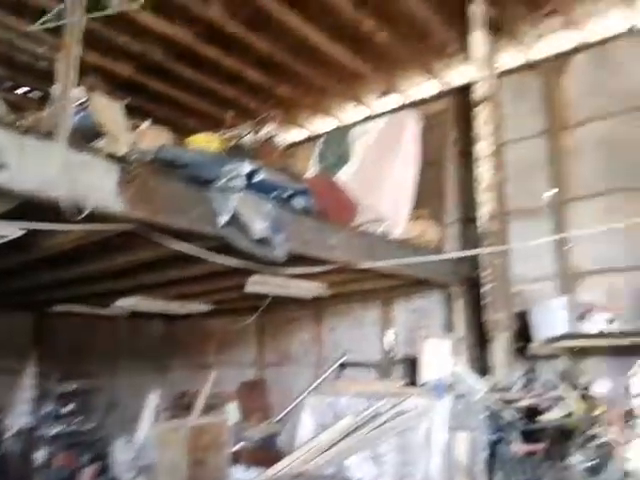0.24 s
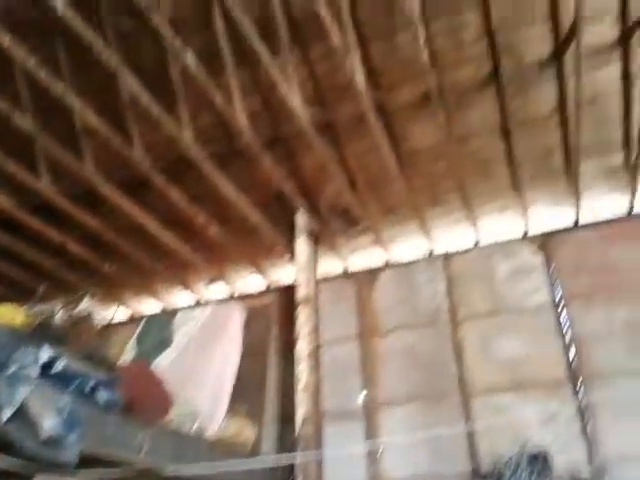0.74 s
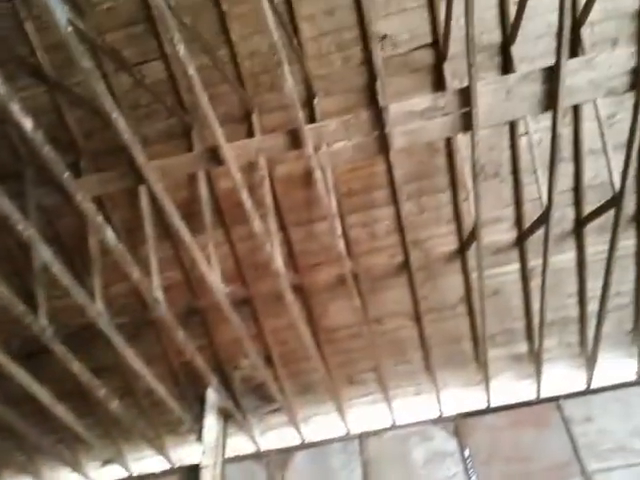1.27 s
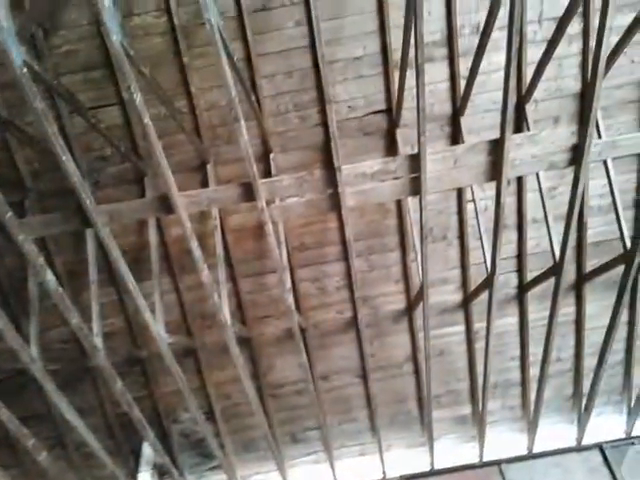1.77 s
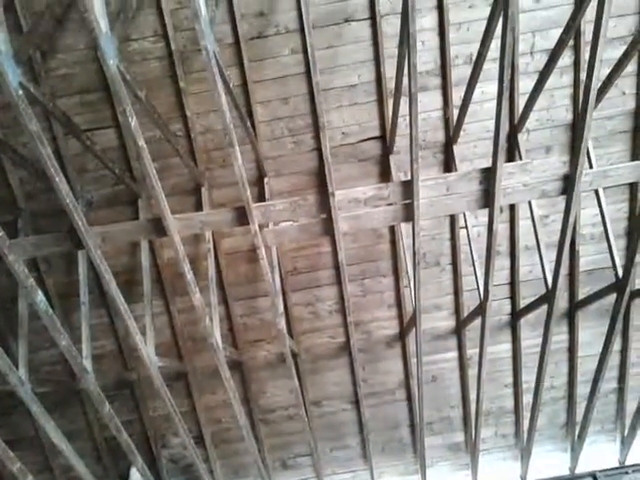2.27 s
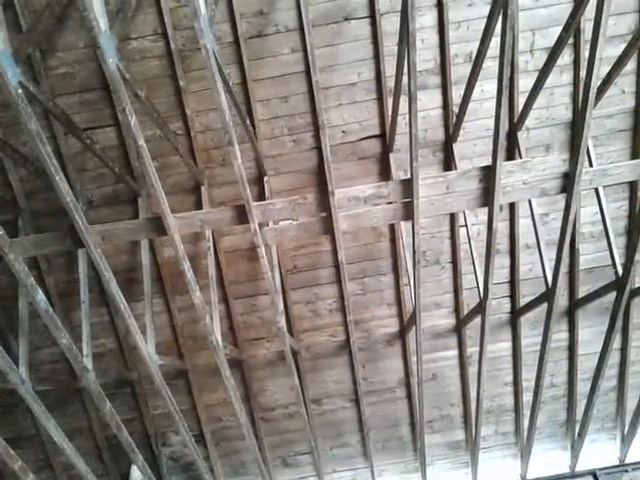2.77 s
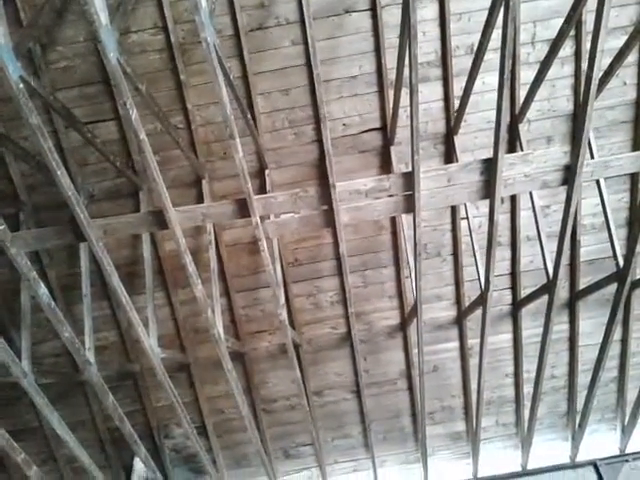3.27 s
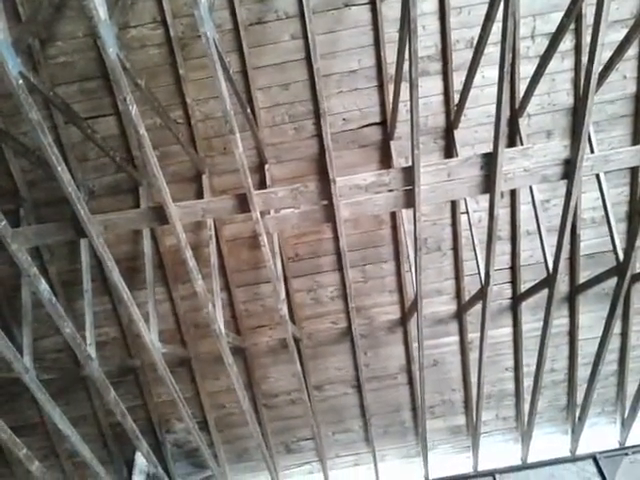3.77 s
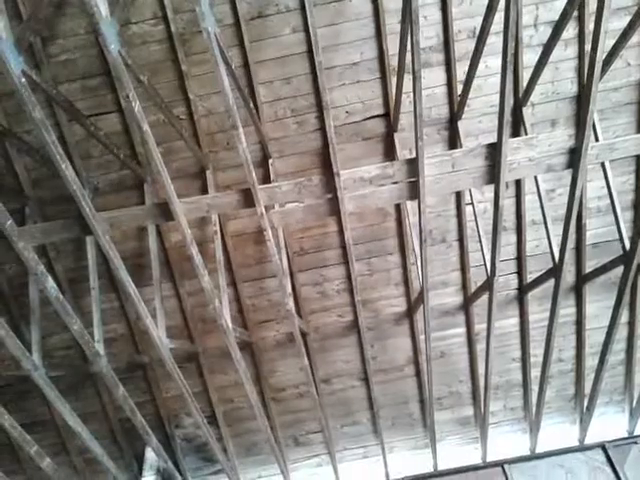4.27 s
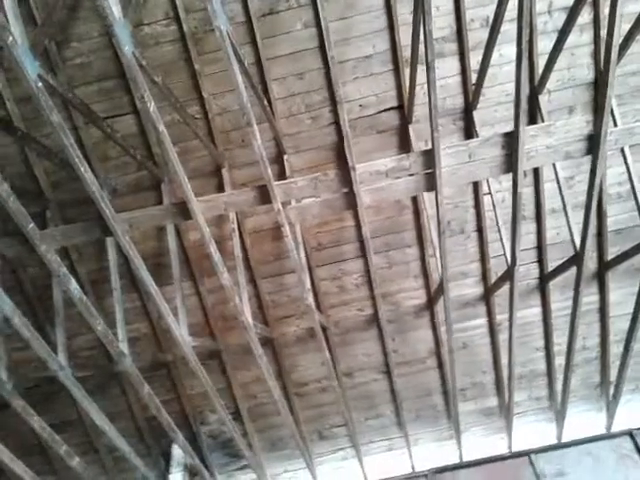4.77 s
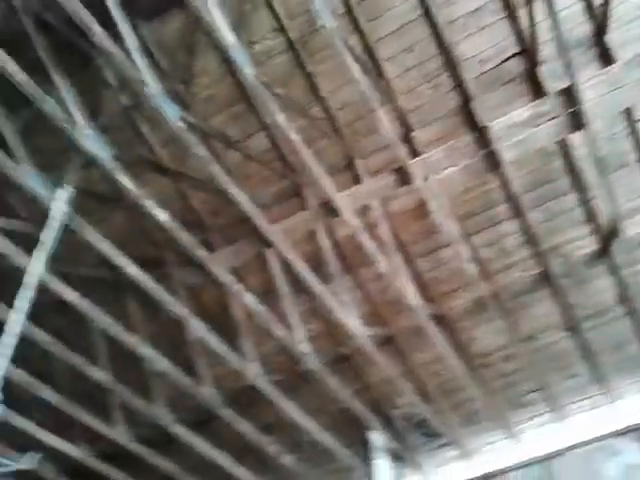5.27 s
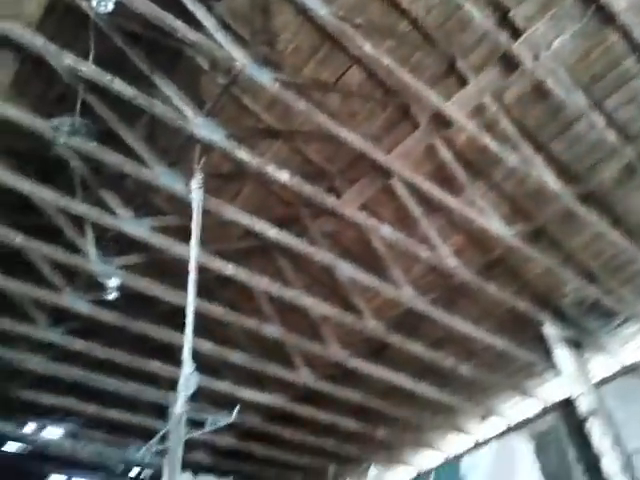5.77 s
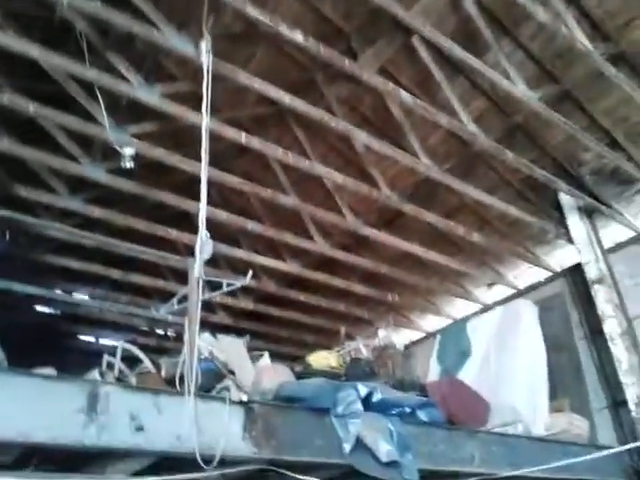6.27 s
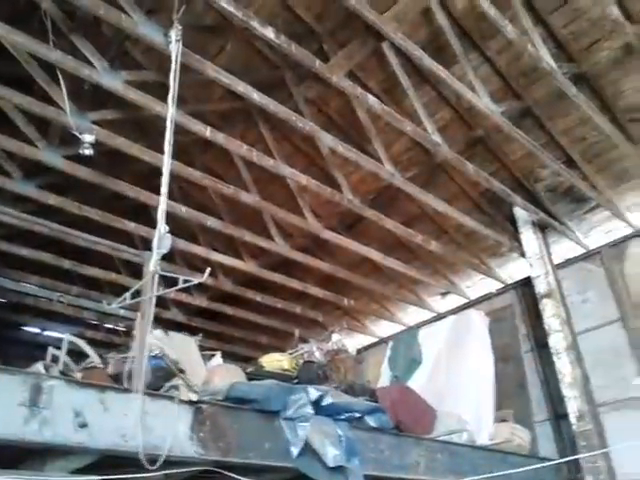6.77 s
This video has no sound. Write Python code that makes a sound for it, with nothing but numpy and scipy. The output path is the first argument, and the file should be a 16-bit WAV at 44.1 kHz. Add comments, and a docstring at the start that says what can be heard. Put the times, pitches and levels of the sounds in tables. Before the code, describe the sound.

Inside a large old barn, swallows give two sharp, high, two-syllable alarm calls. A quieter twitter follows, made of rasps, nasal chirps, thin chips and sliding whistles, with a few light ticks and soft bumps between them. Near the end a distant bird repeats a quick falling figure, growing louder. Each note leaves a short ringing tail. A phone microphone picks it up in mono over a soft outdoor rumble.

```python
"""Over a soft outdoor rumble, swallows give two sharp two-syllable alarm calls under a barn roof.
A twitter follows: rasps and nasal chirps (pulses of air ringing the throat), chips and low slurred
whistles (gliding tones of the syrinx), with a few ticks and bumps between them. Last, from 6.5 s,
a distant bird repeats a falling figure, ever louder. Rafters and walls smear every note into a
ringing tail, and a phone hears it all in mono, ducking the quiet moments."""
import sys
import numpy as np
from scipy import signal
from scipy.fft import rfft, irfft, next_fast_len
from scipy.io import wavfile
from scipy.ndimage import uniform_filter1d, map_coordinates

SR = 44100
rng = np.random.default_rng(int(sys.argv[2]) if len(sys.argv) > 2 else 0)


def to_wav(sig):
    """Store sig (one row per channel, or 1-D mono) as 16-bit WAV at the path in sys.argv[1].

    Samples outside -1..1 are clipped; the rate is SR.
    """
    pcm = np.clip(np.atleast_2d(sig), -1, 1) * 32767
    pcm = np.round(pcm).astype(np.int16)
    wavfile.write(sys.argv[1], SR, pcm.T)  # frames by channels


N = 310023
TIME = np.arange(N) / SR


def undb(db):
    """Decibels to gain."""
    return 10 ** (np.asarray(db) / 20)


def unit(x):
    """Scale to rms 1."""
    return x / np.sqrt(np.mean(x ** 2) + 1e-20)


def add(track, start_s, x):
    """Mix x into the track from start_s on."""
    i = int(start_s * SR)
    x = x[max(-i, 0):max(len(track) - i, 0)]
    track[max(i, 0):max(i, 0) + len(x)] += x


def equalise(x, curve):
    """Filter by an EQ curve of (frequency [Hz], gain [dB]) points."""
    hz, db = np.transpose(curve)
    size = next_fast_len(len(x))
    bin_hz = np.arange(size // 2 + 1) * SR / size
    gain = undb(np.interp(np.log(bin_hz + 1), np.log(hz), db))
    return irfft(rfft(x, size) * gain, size)[:len(x)]


def resonate(x, hz, width_hz):
    """A resonance applied twice, gain 1 at its centre."""
    b, a = signal.iirpeak(hz, hz / width_hz, fs=SR)
    return signal.lfilter(b, a, signal.lfilter(b, a, x))


def wander(size, rate):
    """Smooth random modulation with a spread of about 1, changing rate times a second."""
    steps = np.arange(size) * rate / SR
    return map_coordinates(rng.standard_normal(int(steps[-1]) + 2), [steps], order=3, mode="nearest")


# Tone of the outdoor air: (frequency [Hz], gain [dB])
AIR_EQ = [(15, -19), (25, -59), (33, -7), (119, -2.5), (152, -3), (246, -6), (274, -5), (433, -10.5),
          (614, -13), (684, -14.5), (2060, -19.5), (4750, -28.5), (6920, -19.5), (9810, -36), (15500, -36)]
# Slow swell of the rumble: (time [s], gain [dB])
RUMBLE_SWELL = [(0, -0.5), (1.4, -1), (3.4, -1.5), (5.0, 1.5), (6.2, 1.5), (7.03, 1.5)]


def outdoor_bed(rumble_gain_db=-54.5, air_gain_db=-55, hiss_db=-64, crossover_hz=600):
    """A low outdoor rumble that swells slowly, faint air above it, and a narrow band of high hiss."""
    noise = unit(equalise(rng.standard_normal(N), AIR_EQ))
    rumble = signal.sosfiltfilt(signal.butter(2, crossover_hz, fs=SR, output="sos"), noise)
    air = noise - rumble
    hiss = unit(resonate(rng.standard_normal(N), hz=6900, width_hz=1100))
    swell_db = np.interp(TIME, *np.transpose(RUMBLE_SWELL))
    return undb(rumble_gain_db + swell_db) * rumble + undb(air_gain_db) * air + undb(hiss_db) * hiss


def barn_reverb(send, early_db=-3, tail_db=-2, low_t60=0.79, high_t60=0.47, build_s=0.031, early_s=0.024):
    """Separate echoes off roof and rafters, then a dense tail whose treble dies first."""
    t = TIME[:SR]
    hz, frame_s, spectrum = signal.stft(rng.standard_normal(SR), SR, nperseg=256)
    t60 = np.interp(hz, [3000, 10000], [low_t60, high_t60])
    decay = np.exp(-np.log(1000) * frame_s / t60[:, None])
    tail = signal.istft(spectrum * decay, SR)[1][:SR]
    echoes = rng.standard_normal(SR) * (rng.random(SR) < 500 / SR)  # about 500 a second
    early = echoes * np.exp(-t / early_s)
    build = 1 - np.exp(-t / build_s)  # echoes take a moment to gather
    response = undb(tail_db) * unit(tail * build) + undb(early_db) * unit(early * np.sqrt(build))
    return signal.fftconvolve(send, response / np.sqrt(SR))[:len(send)]


# Dry ticks and soft bumps. In every cue list, level feeds the reverb and direct is added for the dry path:
# (time [s], level [dB], centre [Hz], width [Hz], decay [s], direct [dB])
KNOCK_CUES = [(0.68, -51, 1300, 3000, 0.0038, 7), (0.792, -55.5, 140, 335, 0.013, 16),
              (2.42, -48.5, 1360, 1000, 0.01, -1.5), (2.70, -51, 1350, 800, .008, -1.5),
              (2.825, -57, 1660, 800, 0.024, 5), (5.246, -50, 100, 150, 0.007, 13.5),
              (5.449, -39, 1520, 1200, 0.0031, 2.5), (5.675, -41, 2260, 1700, 0.0065, -0.5),
              (5.922, -44.5, 1590, 2700, 0.013, 0), (5.938, -48, 1700, 2570, 0.014, 6.5)]


def knocks():
    """Each knock is a short burst of noise in one broad resonance."""
    t = TIME[:SR // 5]
    for start_s, db, hz, width_hz, decay_s, direct_db in KNOCK_CUES:
        body = unit(resonate(rng.standard_normal(len(t)), hz, width_hz))
        yield start_s, db, direct_db, body * np.exp(-t / decay_s)


# How the beak colours a whistle's octave: (frequency [Hz], gain [dB])
OCTAVE_EQ = [(5000, -5), (8500, 5), (10000, 19.5), (10900, 10), (11600, 12), (13500, -8), (15500, -26)]


def whistle(length_s, start_hz, mid_hz, end_hz, bend, octave_db=-26, fade_share=0.12, flutter_db=0):
    """The syrinx glides by way of a middle pitch, a weak octave on top; bend 2 arches, 8 holds flat."""
    u = np.linspace(0, 1, int(length_s * SR))
    glide_hz = mid_hz + (start_hz - mid_hz) * (1 - u) ** bend + (end_hz - mid_hz) * u ** bend
    hz = glide_hz * (1 + .006 * wander(len(u), rate=900))
    phase = 2 * np.pi * np.cumsum(hz) / SR
    push = np.sin(np.pi * u)  # the octave grows with the push of air
    tone = np.sin(phase) + undb(octave_db) * push * equalise(np.sin(2 * phase), OCTAVE_EQ)
    flutter = undb(flutter_db * wander(len(u), rate=190))
    return unit(tone * flutter * signal.windows.tukey(len(u), fade_share))


# A distant bird's figure, louder at each repeat: (time [s], level [dB])
FAR_CUES = [(6.512, -62.5), (6.638, -58.5), (6.766, -55.5), (6.893, -55), (7.02, -53)]
# The notes of the figure: (offset [s], length [s], from [Hz], to [Hz], trim [dB], direct [dB])
FAR_FIGURE = [(-.023, 0.0184, 2934, 2420, 0, -4), (-.012, 0.0197, 5270, 4630, -11, 0),
              (0.001, .02, 4300, 3400, -3.5, -6), (0.011, 0.0143, 3500, 2950, 0.5, -2),
              (.03, 0.0156, 2900, 2760, -3, 8)]


def far_bird():
    """A figure of soft, fluttering, falling whistles, about eight times a second."""
    for start_s, db in FAR_CUES:
        for offset_s, length_s, from_hz, to_hz, trim_db, direct_db in FAR_FIGURE:
            note = whistle(length_s, from_hz, (from_hz + to_hz) / 2, to_hz,
                           bend=1, octave_db=-45, fade_share=0.35, flutter_db=3)
            yield start_s + offset_s, db + trim_db, direct_db, note


# Low warbled whistles: (time [s], length [s], from [Hz], to [Hz], level [dB])
SLUR_CUES = [(-.06, 0.051, 3200, 4905, -41.5), (-.015, 0.069, 4950, 3087, -53),
             (1.82, 0.022, 3015, 4700, -44), (4.496, 0.067, 3550, 3050, -55),
             (4.559, 0.04, 3310, 4220, -52), (4.701, 0.052, 3400, 3990, -49.5),
             (4.751, 0.039, 3750, 2630, -48), (4.808, .036, 3130, 4470, -45)]


def slurs(direct_db=-13):
    """Whistles that glide up or down and linger toward their high end."""
    for start_s, length_s, from_hz, to_hz, db in SLUR_CUES:
        mid_hz = min(from_hz, to_hz) + .62 * abs(to_hz - from_hz)
        yield start_s, db, direct_db, whistle(length_s, from_hz, mid_hz, to_hz, bend=2.03)


# Clear chips, drier when the bird faces the phone:
# (time [s], length [s], pitch [Hz], level [dB], direct [dB])
CHIP_CUES = [(0.086, .04, 7200, -50, -13.5), (0.995, .008, 5447, -30.5, 6.5), (1.53, .11, 6860, -57, -17),
             (1.741, 0.032, 7130, -45, -1), (1.837, 0.031, 7200, -47.5, 1.5), (2.674, 0.021, 6830, -47, 14),
             (3.545, 0.0385, 5960, -56, 4), (3.635, 0.011, 5990, -44, 4), (3.728, 0.045, 5820, -53, 6)]


def chips():
    """Nearly pure whistles that flick up to one pitch and hold it."""
    for start_s, length_s, hz, db, direct_db in CHIP_CUES:
        chip = whistle(length_s, .91 * hz, hz, hz, bend=4.9, octave_db=-45, fade_share=0.23)
        yield start_s, db, direct_db, chip


# Tone of the open beak: (frequency [Hz], gain [dB])
BEAK_EQ = [(700, 0), (1400, -5.5), (2500, 8), (3500, 10.5), (5000, 13), (7500, -12), (9000, -6),
           (10300, -1), (11500, -39), (15000, -34)]


def rasp(length_s, start_hz, top_hz, throat_hz, beak_db, roughness, throat_width_hz=1250):
    """Uneven pulses and puffs of air rise in pitch and ring the throat; an open beak adds lower tones."""
    u = np.linspace(0, 1, int(length_s * SR))
    glide_hz = top_hz + (start_hz - top_hz) * (1 - u) ** 2
    hz = glide_hz * (1 + 0.076 * roughness * wander(len(u), rate=1508))
    phase = 2 * np.pi * np.cumsum(hz) / SR
    overtones = sum(np.cos(k * phase) * (k * hz < SR / 2) for k in range(2, 13))
    pulses = unit(np.cos(phase) / 2 + overtones)  # sharp, with a weak fundamental
    puffs = unit(rng.standard_normal(len(u)) * (1 + np.cos(phase)))
    breath_share = np.clip(roughness, 0, 1) ** 2
    buzz = np.sqrt(1 - breath_share) * pulses + np.sqrt(breath_share) * puffs
    flutter = undb(3 * roughness * wander(len(u), rate=600))
    voice = buzz * flutter * signal.windows.tukey(len(u), .8)
    throat = unit(resonate(voice, throat_hz, throat_width_hz))
    beak = unit(equalise(voice, BEAK_EQ))
    return unit(throat + undb(beak_db) * beak)


# Buzzy notes of the twitter: (time [s], length [s], top pitch [Hz], throat resonance [Hz],
# level [dB], open beak [dB], roughness [0 pulses, 1 and up all breath])
RASP_CUES = [(0.006, 0.036, 1745, 7200, -48.5, 2, 0.6), (0.691, 0.043, 1700, 7010, -53, -10, 1.05),
             (1.342, 0.023, 1435, 6670, -53, -9, 1.1), (1.478, 0.14, 2010, 7470, -58, -23, 0.5),
             (1.722, 0.055, 1873, 6870, -44.5, -11.5, 0.9), (2.211, .058, 2321, 6580, -38, -11, 1.14),
             (2.295, 0.071, 2232, 6470, -37, -13.5, 0.97), (2.393, 0.066, 1403, 6470, -40.5, -10, 1.2),
             (2.503, 0.067, 3010, 6650, -40.5, -4, 0.86), (2.653, 0.045, 1714, 6560, -37.5, -12.5, 1.05),
             (2.796, 0.053, 1713, 6700, -40.5, -11.5, 0.98), (2.891, .041, 3100, 6930, -53.5, 0, 0.55),
             (3.385, 0.063, 2366, 6380, -50, -2.5, 0.86), (3.491, 0.067, 2752, 6000, -50.5, 1, 0.76),
             (3.616, 0.041, 2033, 6330, -42, -10, 0.28), (3.714, 0.043, 2016, 5400, -47.5, -2, 0.4),
             (3.842, 0.033, 1965, 7440, -54.5, 2.5, 0.56), (4.252, .019, 1840, 7120, -51.5, -11.5, 0.87),
             (4.959, 0.041, 1778, 6700, -46.5, 1, 0.82), (5.036, 0.056, 1756, 6650, -43.5, -4, 0.66),
             (5.414, 0.05, 2290, 6750, -48, 0.5, 1.2), (5.909, 0.051, 2004, 6900, -53.5, -7, 0.67)]


def twitter_rasps(direct_db=-3):
    """Rising buzzes, from nasal chirps to breathy scrapes."""
    for start_s, length_s, top_hz, throat_hz, db, beak_db, roughness in RASP_CUES:
        yield start_s, db, direct_db, rasp(length_s, .81 * top_hz, top_hz, throat_hz, beak_db, roughness)


# The alarm call, given twice: (time [s], level [dB], accent on the second syllable [dB])
ALARM_CUES = [(.154, -31, 3.5), (0.867, -32, -2.5)]
# Its whistle layer: (offset [s], length [s], start [Hz], middle [Hz], end [Hz], trim [dB],
# bend [exponent], direct [dB])
ALARM_WHISTLES = [(0.001, 0.037, 5220, 7200, 5500, 1.5, 7.1, -8),
                  (0.002, 0.038, 4440, 4880, 5070, -14, 2.2, -4),
                  (0.034, .045, 3140, 3480, 4000, -18.5, 1.7, -3),
                  (.045, .024, 7040, 7000, 4470, -1, 4, -23),
                  (0.074, 0.059, 4583, 5416, 5160, -.5, 8.63, -5),
                  (.111, 0.028, 7160, 7020, 5200, 3, 5.8, -8), (0.122, .022, 4855, 3260, 2870, -16, 2, -14)]
# Its buzz layer, one per syllable: (offset [s], length [s], trim [dB], open beak [dB])
ALARM_RASPS = [(.003, .06, -18, -4.5), (.09, 0.0488, -14, -9.5)]


def alarm_calls(second_syllable_s=.06, buzz_direct_db=-2):
    """Two sharp syllables: pure notes from both sides of the syrinx, layered over a buzz."""
    for start_s, db, accent_db in ALARM_CUES:
        layers = []
        for offset_s, length_s, start_hz, mid_hz, end_hz, trim_db, bend, direct_db in ALARM_WHISTLES:
            note = whistle(length_s, start_hz, mid_hz, end_hz, bend, octave_db=-29, fade_share=0.16)
            layers.append((offset_s, trim_db, direct_db, note))
        for offset_s, length_s, trim_db, beak_db in ALARM_RASPS:
            buzz = rasp(length_s, start_hz=1520, top_hz=1740, throat_hz=6650, beak_db=beak_db,
                        roughness=0.95, throat_width_hz=1900)
            layers.append((offset_s, trim_db, buzz_direct_db, buzz))
        for offset_s, trim_db, direct_db, sound in layers:
            level_db = db + trim_db + accent_db * (offset_s > second_syllable_s)
            yield start_s + offset_s, level_db, direct_db, sound


def scene(preroll_s=.1):
    """Knocks and birds, direct and through the barn, over the outdoor bed; both channels are the same."""
    send, direct = np.zeros((2, N + int(preroll_s * SR)))
    for source in (knocks, alarm_calls, slurs, chips, twitter_rasps, far_bird):
        for start_s, db, direct_db, sound in source():
            add(send, start_s + preroll_s, undb(db) * sound)
            add(direct, start_s + preroll_s, undb(db + direct_db) * sound)
    mix = (direct + barn_reverb(send))[-N:] + outdoor_bed()
    return np.array([mix, mix])


def noise_suppressor(x, threshold_db=-58, knee_db=4, treble_cut_db=11, bass_cut_db=8.5, lag_s=0.03):
    """Whenever the birds fall quiet, treble and bass are turned down after a short lag."""
    treble = signal.sosfiltfilt(signal.butter(2, 800, "high", fs=SR, output="sos"), x)
    sidechain = signal.sosfiltfilt(signal.butter(2, 1800, "high", fs=SR, output="sos"), x)
    level_db = 10 * np.log10(np.abs(uniform_filter1d(sidechain ** 2, SR // 25)) + 1e-12)
    quiet = .5 - .5 * np.tanh((level_db - threshold_db) / knee_db)
    pole = np.exp(-1 / (lag_s * SR))
    duck = signal.lfilter([1 - pole], [1, -pole], quiet)
    return treble * undb(-treble_cut_db * duck) + (x - treble) * undb(-bass_cut_db * duck)


def record(dry, low_cut_hz=48, high_cut_hz=15750):
    """The phone cuts the deep bass, ducks quiet moments and cuts the top."""
    low_cut = signal.butter(4, low_cut_hz, "high", fs=SR, output="sos")
    high_cut = signal.ellip(10, .2, 70, high_cut_hz, fs=SR, output="sos")
    ducked = noise_suppressor(signal.sosfilt(low_cut, dry))
    return signal.sosfilt(high_cut, ducked)


dry = scene()
out = record(dry)
to_wav(out)
```